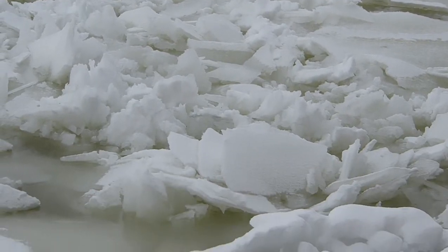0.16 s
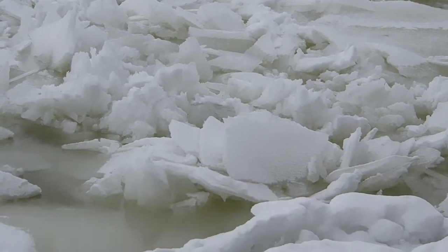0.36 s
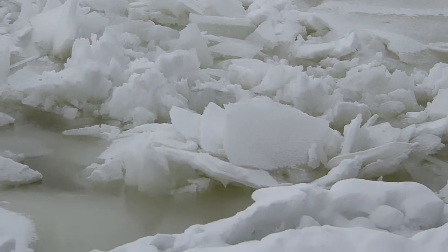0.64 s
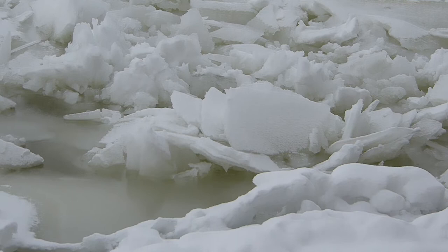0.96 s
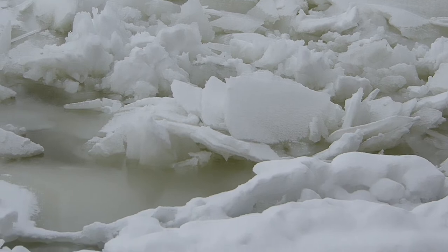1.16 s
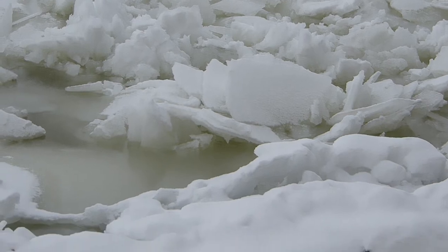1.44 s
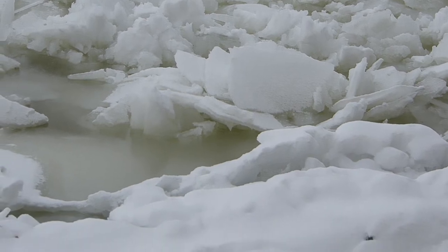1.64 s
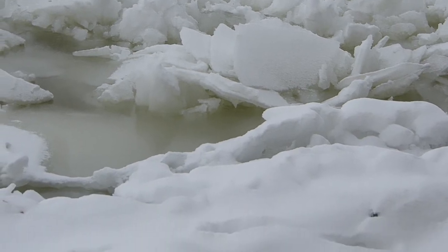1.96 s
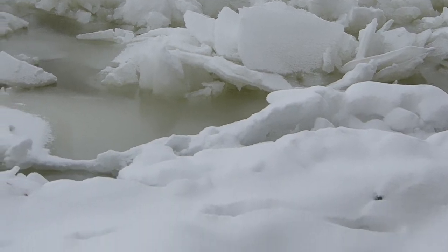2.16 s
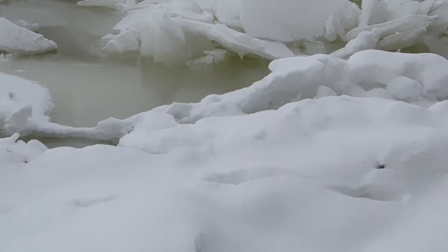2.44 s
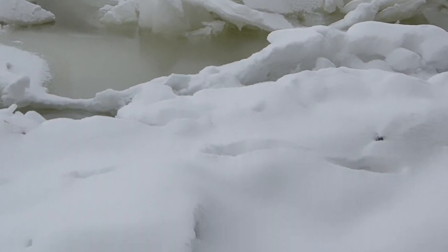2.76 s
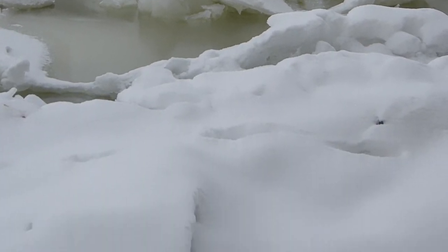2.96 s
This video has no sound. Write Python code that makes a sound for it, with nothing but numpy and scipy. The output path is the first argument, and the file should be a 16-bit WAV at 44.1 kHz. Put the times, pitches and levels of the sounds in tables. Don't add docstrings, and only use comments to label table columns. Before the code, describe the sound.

Gusty wind buffets a small camera's microphones with deep thumps and flutter beside an icy river.

```python
import sys
import numpy as np
from scipy import signal
from scipy.fft import rfft, irfft
from scipy.io import wavfile
from scipy.ndimage import uniform_filter1d

SR = 44100
rng = np.random.default_rng(int(sys.argv[2]) if len(sys.argv) > 2 else 0)


def elevation(decibels):
    levels = np.asarray(decibels, float)
    return 10 ** (levels / 20)


def unload_audio(sound):
    columns = np.transpose(np.atleast_2d(sound))
    steps = np.round(np.clip(columns, -1, 1) * 32767)
    wavfile.write(sys.argv[1], SR, steps.astype(np.int16))


N = 137151

# (frequency [Hz], level [dB per Hz])
RIVER_TONE = [(300, 10.5), (1500, 1.5), (3000, -2), (4200, 2), (5000, 5), (7500, 3.5), (10500, -7),
              (15500, -28)]
# (frequency [Hz], level [dB per Hz])
RIVER_SIDE_TONE = [(1000, -2), (3800, -3), (5000, 1), (8000, 0), (11000, -9), (15500, -21)]
# (time [s], level [dB])
RIVER_SWELL = [
    (0.0, -59),
    (0.05, -61.5),
    (0.4, -60),
    (0.53, -62),
    (2.37, -62.5),
    (2.4, -59),
    (2.41, -62),
    (2.97, -58.5),
    (3.1, -65.5),
]
# (time [s], level [dB], ring [Hz], fade by 60 dB [s], side share [ratio])
ICE_TICKS = [
    (2.392, -54, 5150, .03, -.2),
    (2.686, -57, 2500, .015, -.4),
    (3.046, -49.5, 14500, .007, -1.1),
]
# (time [s], gust level [dB], extra flutter [dB])
GUSTS = [(0.02, -22.6, -3.5), (0.29, -32.7, -0.3), (0.48, -24.5, -1.7), (0.82, -27.7, 1.6),
         (1.01, -21.7, 1.3), (1.15, -30.5, -4.9), (1.26, -26.2, 4.2), (1.35, -24.5, -2.1),
         (1.54, -41.3, 1.9), (1.7, -23.6, -5.1), (1.81, -24.5, 6.2), (1.85, -25.1, -1.7),
         (2.42, -27.8, 3.1), (2.48, -33.3, 1.7), (2.56, -22.7, -0.4), (2.78, -38.3, -0.8),
         (2.95, -22.4, -0.6), (3.07, -28.0, -0.6)]
# (time [s], lift [dB])
SWIRLS = [(.04, 3.5), (0.134, -7.5), (.18, 0.5), (0.243, 5.5), (0.328, 0.5), (.41, 2), (.545, -6.5),
          (.6, 0), (.67, 2.5), (1.08, 2.5), (1.309, -4), (1.37, 0.5), (1.23, -5.5), (1.6, 6), (1.645, -1),
          (1.97, 1), (2.03, 3.5), (2.2, -3), (2.282, -11), (2.37, 2), (2.6, -2), (2.65, 1.5), (2.7, 3.5),
          (2.76, -1), (2.83, -1), (3.1, -7)]
# (time [s], thump [dB], flutter [dB])
BUFFETS = [(0.039, -11.5, -32.5), (0.108, -20, -39.5), (0.173, -18.5, -43), (0.185, -15.5, -48),
           (0.333, -19.5, -46), (0.373, -17.5, -42.0), (0.415, -18.5, -44), (0.476, -15, -38.0),
           (0.505, -11, -35.0), (0.591, -23, -36), (0.606, -17, -32.5), (0.638, -18.5, -46),
           (0.685, -21, -33.5), (0.771, -17, -39), (0.819, -17.5, -38.0), (0.858, -28, -37),
           (0.915, -17.5, -43), (0.963, -21, -34.5), (0.987, -12.5, -32.5), (1.009, -14, -29.5),
           (1.019, -18, -36), (1.189, -18, -48), (1.248, -18.5, -37), (1.26, -18, -31), (1.272, -15, -40),
           (1.33, -17, -41.5), (1.372, -21.5, -34.5), (1.596, -21.5, -53), (1.609, -27, -42.0),
           (1.679, -16.5, -40), (1.715, -16, -46.5), (1.748, -23, -36), (1.788, -18, -30),
           (1.811, -13.5, -26.5), (1.855, -12, -38.5), (1.904, -18, -43), (1.955, -18.0, -43),
           (1.982, -24.0, -32.5), (2.021, -21.0, -35.5), (2.031, -15.5, -46), (2.076, -17.5, -36),
           (2.103, -15.5, -36), (2.126, -22, -37.5), (2.191, -15, -36), (2.24, -17.5, -33.5),
           (2.273, -26, -40.5), (2.371, -15.5, -38), (2.395, -23.0, -32), (2.534, -21.5, -42),
           (2.571, -14, -37.5), (2.623, -20.0, -37), (2.644, -20.0, -39), (2.704, -23.5, -39),
           (2.798, -22.5, -57), (2.852, -24.5, -42.0), (2.886, -18, -53), (2.95, -15.5, -35.5),
           (2.986, -19.5, -34.5), (3.048, -17, -34.5), (3.097, -18, -38.5)]
# (frequency [Hz], level [dB per Hz])
SUM_TONE = [(45, -48.5), (80, -15), (190, -5.5), (420, -11.5), (1000, -22), (2000, -35.5), (3500, -52.5),
            (8000, -74)]
# (frequency [Hz], level [dB per Hz])
DIFFERENCE_TONE = [(50, -44), (85, -17), (160, 0), (430, -4), (1000, -22), (2000, -41), (3500, -63),
                   (8000, -90)]


def evened(x):
    return x / np.sqrt(np.mean(x ** 2, -1, keepdims=True) + 1e-20)


def response(points, lead=0.):
    hz, (f, db) = abs(np.fft.fftfreq(8192, 1 / SR)), np.transpose(points)
    log_gain = np.log(elevation(np.interp(np.log(hz + 1), np.log(f), db)))
    taps = np.fft.ifft(np.exp(log_gain - 1j * signal.hilbert(log_gain).imag))
    turned = signal.hilbert(taps.real) * np.exp(1j * lead)
    taps = np.roll(turned.real, 256)[:4096]
    return taps / np.linalg.norm(taps)


def colour(x, points, lead=0.):
    return signal.oaconvolve(x, response(points, lead))[256:N + 256]


def wander(seconds, count):
    size = max(int(seconds * SR), 2)
    x = rng.standard_normal((count, N))
    return evened(uniform_filter1d(uniform_filter1d(x, size), size))


def add(mix, s, sound):
    part = mix[max(round(s * SR), 0):][:len(sound)]
    part += sound[:len(part)]


def river():
    middle_db, side_db = -63, -70
    t, (s, db) = np.arange(N) / SR, np.transpose(RIVER_SWELL)
    swell_db = np.interp(t, s, db - db.mean())
    flicker_db = 0.68 * wander(0.081, count=1)[0] + 0.7 * wander(0.013, count=1)[0]
    mid, side = rng.standard_normal((2, N)) * elevation(swell_db + flicker_db)
    return np.array([elevation(middle_db) * colour(mid, RIVER_TONE), elevation(side_db) * colour(side, RIVER_SIDE_TONE)])


def ice():
    out, t = np.zeros((2, N)), np.arange(2000) / SR
    for (s, db, hz, t60, side), noise in zip(ICE_TICKS, rng.standard_normal((len(ICE_TICKS), 2000))):
        r = np.exp(-np.pi * .07 * hz / SR)
        ring = signal.lfilter([1], [1, -2 * r * np.cos(2 * np.pi * hz / SR), r * r], noise)
        band = signal.butter(4, [900, min(1.5 * hz, 16000)], "band", fs=SR)
        crack = evened(signal.lfilter(*band, noise))
        ring_share = 1.2 * min(6000 / hz, 1)
        fade = np.minimum(t / .001, 1) * elevation(db - 60 * t / t60)
        sound = fade * (ring_share * evened(ring) + crack)
        add(out.T, s, sound[:, None] * [1, side])
    return out


def low_part(x):
    hz = np.fft.rfftfreq(x.shape[-1], 1 / SR)
    return irfft(rfft(x) / (1 + (hz / 900) ** 4), x.shape[-1])


def paired(air):
    lee = elevation(-5) * air[1]
    return np.array([air[0] + lee, air[0] - lee])


def eddy(noise, db, seconds, taps):
    puff = paired(noise) * np.exp(-(np.arange(-400, 400) / SR / seconds) ** 2)
    heard = np.linalg.norm(signal.fftconvolve(puff, taps, axes=1), axis=1)
    return puff * (elevation(db) / heard)[:, None]


def turbulence():
    lump_db, flick_db, flutter_depth = 1, 1.57, 1.8
    low_level_db, flutter_level_db = -2, -2
    t, (s, db, extra_db) = np.arange(N) / SR, np.transpose(GUSTS)
    swirl_seconds = 0.017
    swirls = sum(lift * np.exp(-((t - at) / swirl_seconds) ** 2) for at, lift in SWIRLS)
    gust = np.interp(t, s, db) + swirls
    lumps, flicks = wander(.0088, count=2), wander(.0052, count=5)

    def mix(common, own):
        share = 0.73
        return share * common + np.sqrt(1 - share ** 2) * own

    low_db = lump_db * lumps[0] + flick_db * mix(flicks[0], flicks[1:3])
    top_db = lump_db * mix(lumps[0], lumps[1]) + flick_db * mix(flicks[0], flicks[3:5])
    calm = np.prod([1 - .6 * np.exp(-((t - row[0]) / .006) ** 2) for row in BUFFETS], 0)
    air = paired(rng.standard_normal((2, N))) * calm
    low = air * elevation(gust + low_level_db) * evened(elevation(low_db))
    flutter_gust = gust + np.interp(t, s, extra_db) + flutter_level_db
    top = air * elevation(flutter_gust) * evened(elevation(flutter_depth * top_db))
    return low, top


def ports():
    low, top = turbulence()
    taps = np.array([response(SUM_TONE), response(DIFFERENCE_TONE)])
    top_taps = taps - low_part(taps)
    thump_db = 21.3 + np.array([-1, 0])
    flap_db = 21 + np.array([4.5, 0])
    for (s, thump_lift, flap_lift), chance in zip(BUFFETS, rng.standard_normal((len(BUFFETS), 4, 800))):
        thump = eddy(chance[:2], thump_lift + thump_db, .005, taps)
        flap = eddy(chance[2:], flap_lift + flap_db, .0032, top_taps)
        add(low.T, s - 480 / SR, thump.T)
        add(top.T, s - 420 / SR, flap.T)
    return low_part(low - top) + top


def wind():
    both, apart = ports()
    middle = -elevation(-18) * colour(both, SUM_TONE, lead=.45)
    return np.array([middle, colour(apart, DIFFERENCE_TONE)])


def scene():
    mid, side = river() + ice() + wind()
    return np.array([mid + side, mid - side])


def top_cut(x):
    return signal.sosfilt(signal.butter(12, 15400, fs=SR, output="sos"), x)


def record(dry):
    air_hz, duck_strength, duck_seconds, most_lift_db = 10400, 1.2, .05, 3.5
    converter_offset = -.0032
    power = uniform_filter1d((dry ** 2).mean(0), int(duck_seconds * SR))
    power_db = 10 * np.log10(abs(power) + 1e-9)
    share = 1 / (1 + (air_hz / (np.fft.rfftfreq(N, 1 / SR) + 1)) ** 12)
    air = irfft(rfft(dry) * share, N)
    lift_db = np.minimum(duck_strength * (np.median(power_db) - power_db), most_lift_db)
    ducked = dry + air * (elevation(lift_db) - 1)
    return top_cut(ducked + converter_offset)


dry = scene()
out = record(dry)
unload_audio(out)
```